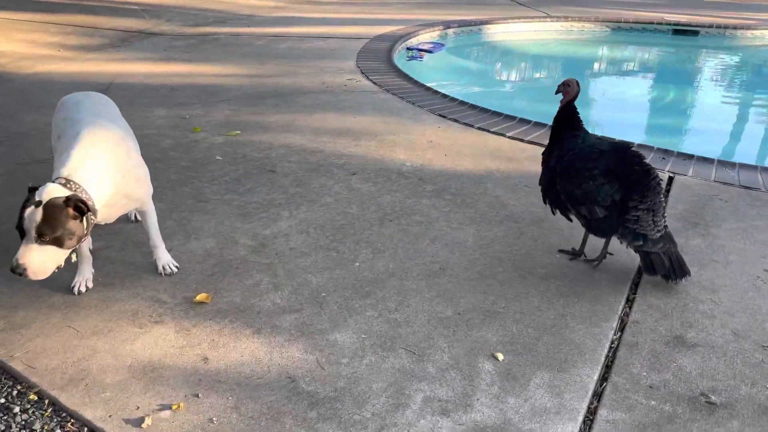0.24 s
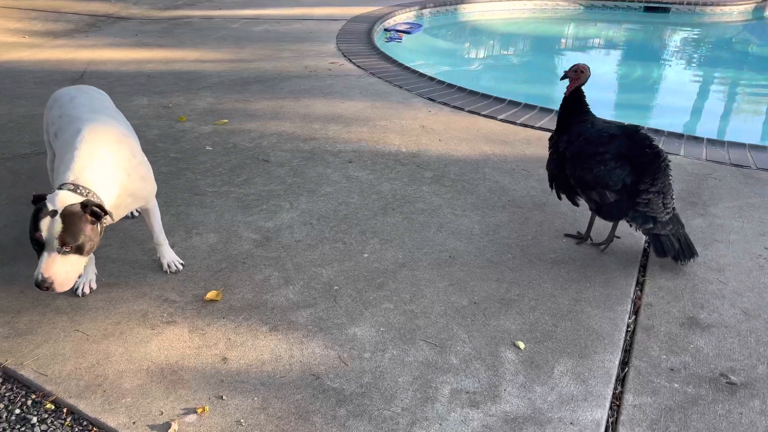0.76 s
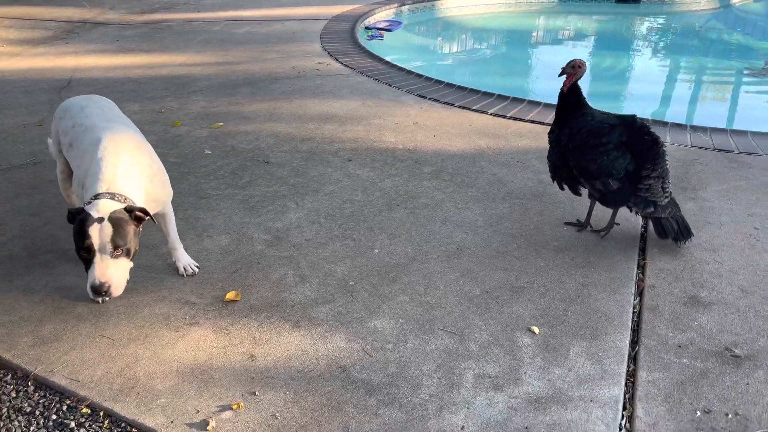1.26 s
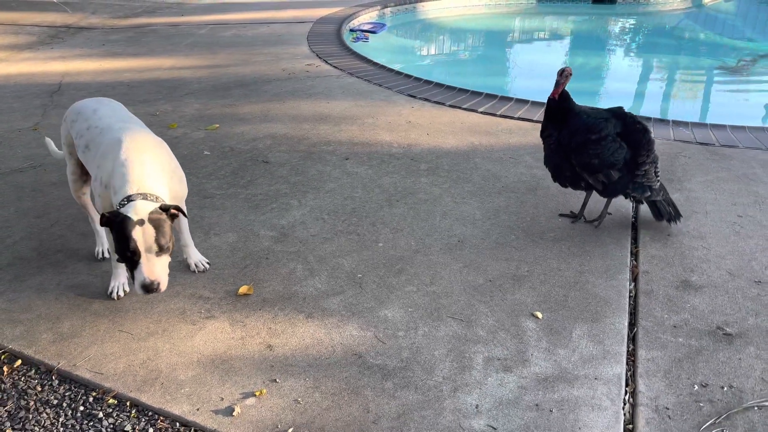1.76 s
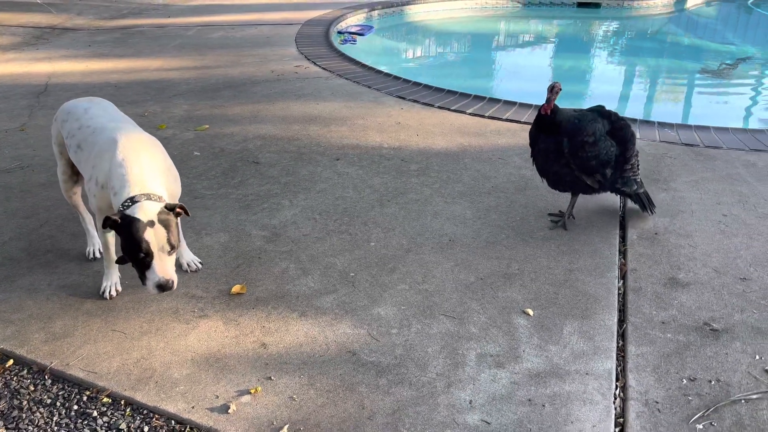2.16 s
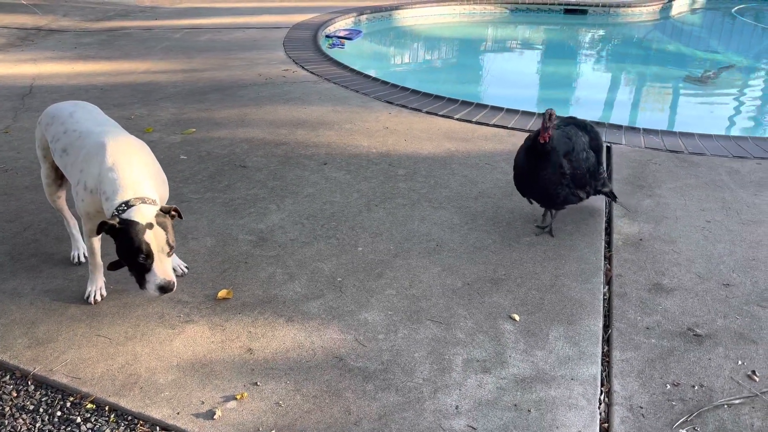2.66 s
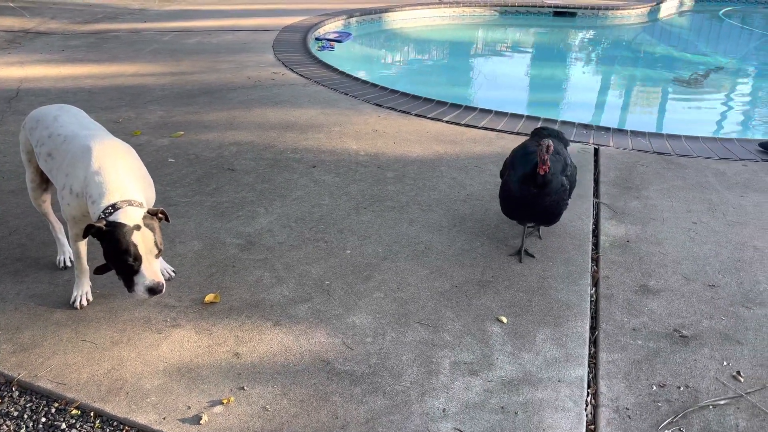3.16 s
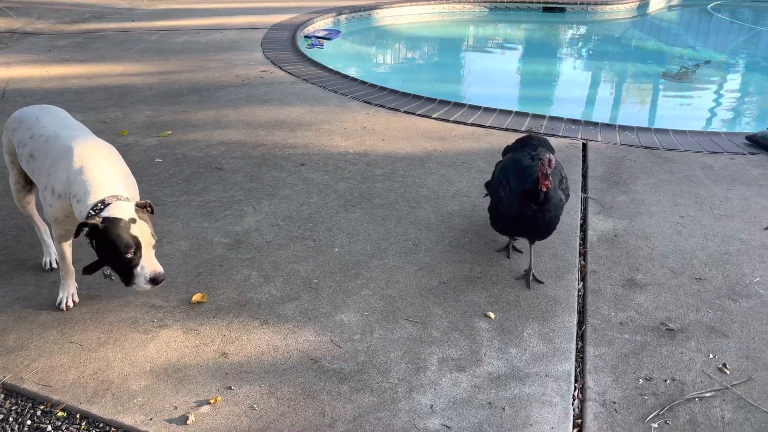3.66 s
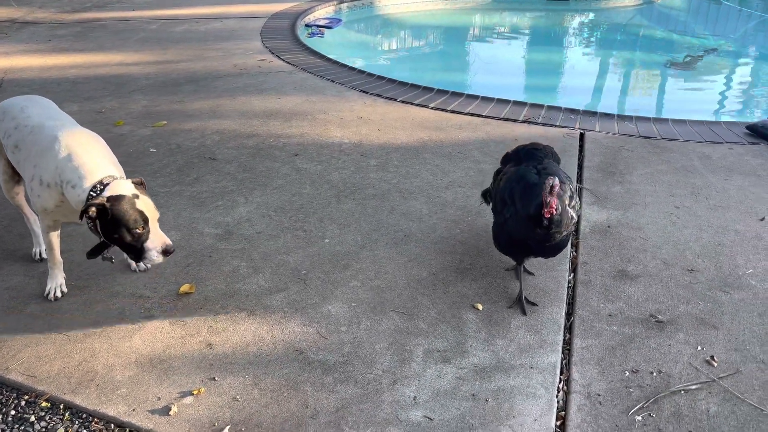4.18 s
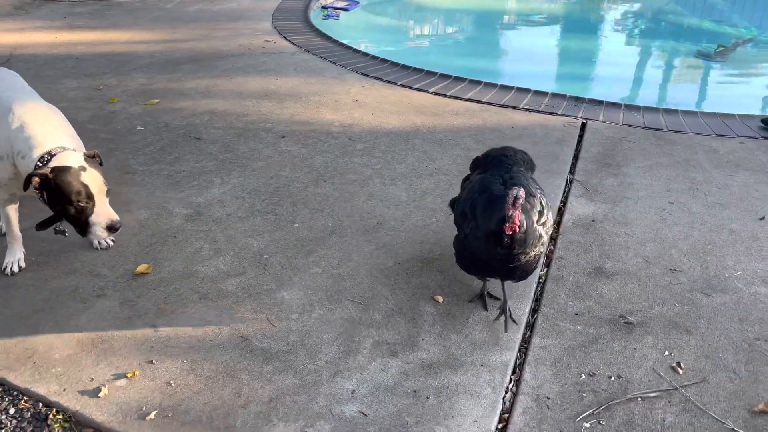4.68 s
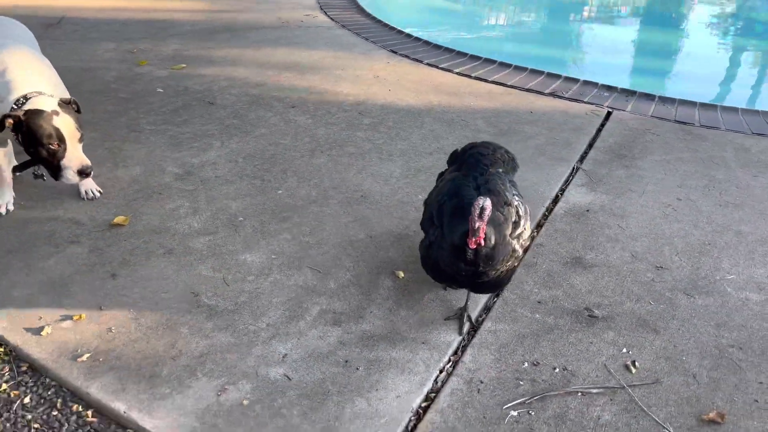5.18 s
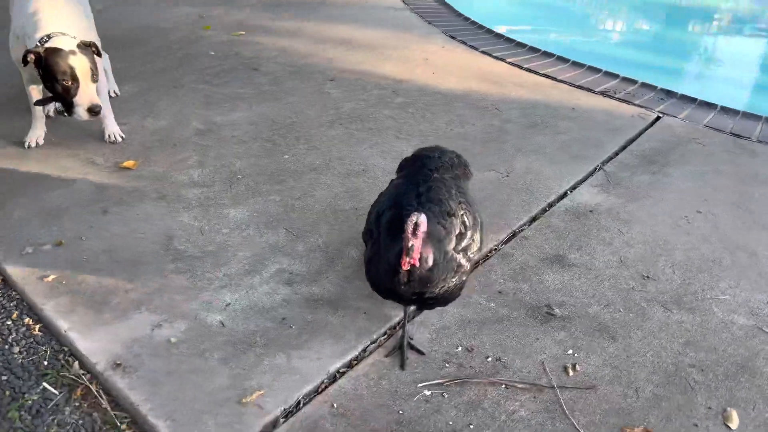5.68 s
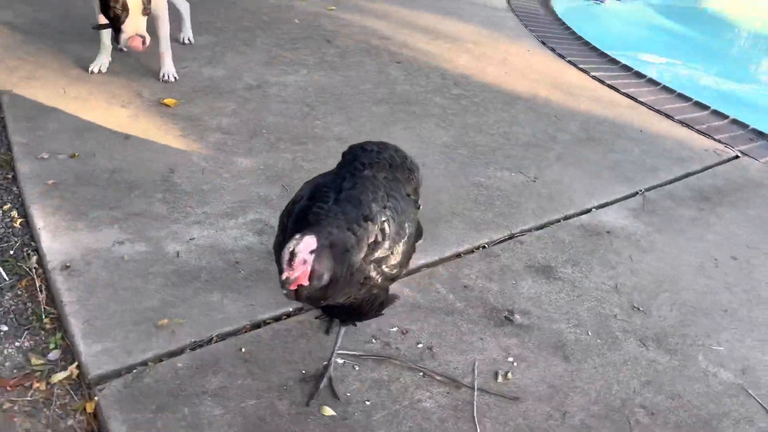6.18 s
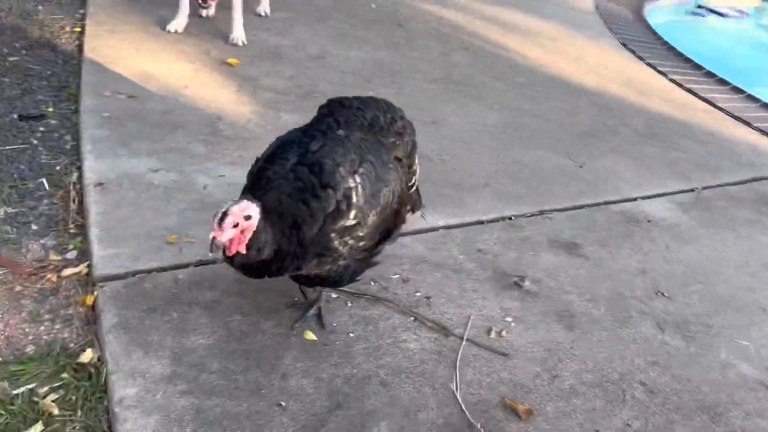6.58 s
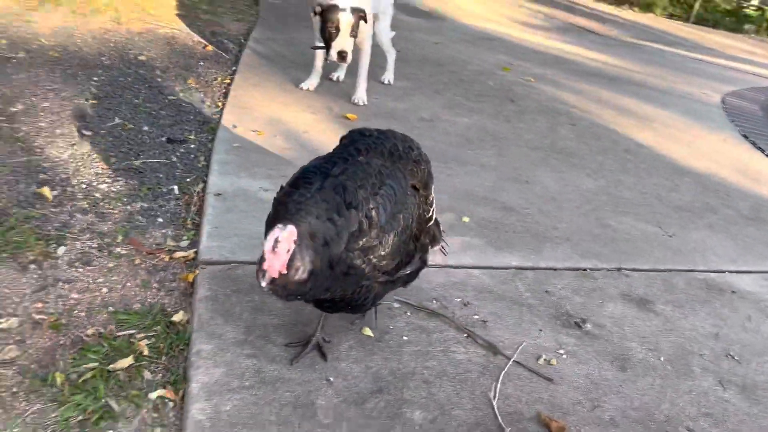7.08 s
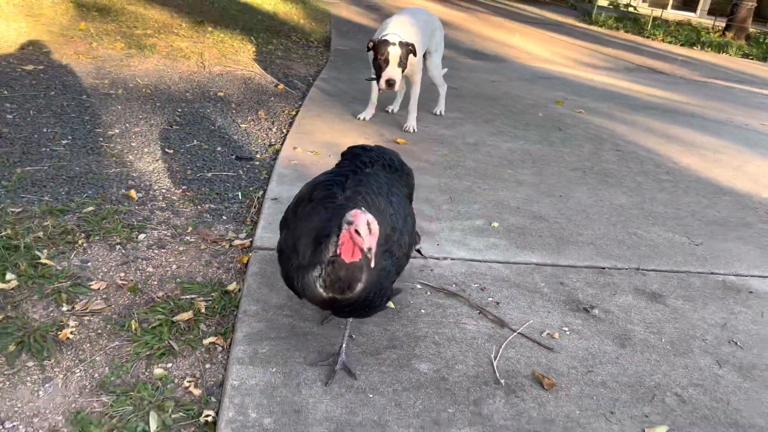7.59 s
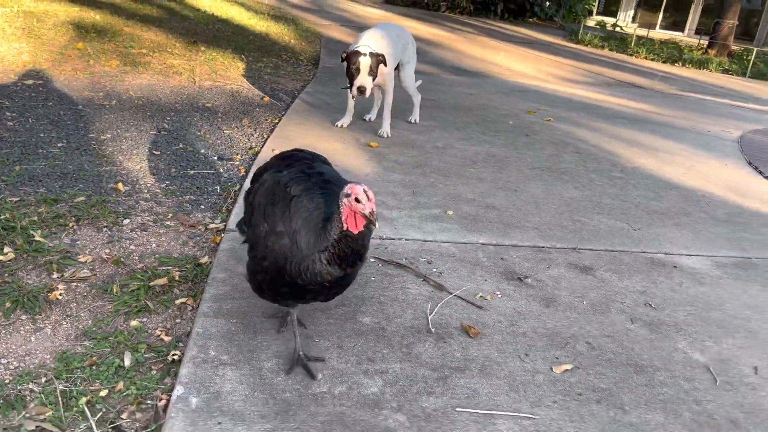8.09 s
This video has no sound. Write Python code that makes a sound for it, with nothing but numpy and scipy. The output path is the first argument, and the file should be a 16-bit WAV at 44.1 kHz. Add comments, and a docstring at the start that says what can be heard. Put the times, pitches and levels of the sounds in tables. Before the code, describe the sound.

A phone microphone outdoors by a pool hears steady low pump hum, distant traffic rumble, soft moving air, faint insect shrill and, mainly in the first 2.5 s, a far trilling bird. A turkey opens with a buzzy peep at 0 s and four rapid clucks at 0.2, another peep at 0.8, a cracked note and sharp dry pop near 1.0, then peep, clucks and a short grunt from 1.7 to 2.0. A slurred whistle comes at 2.5, two ragged yelps at 2.75 and 2.9. A small rooster crows from 2.85 to 4.75, hoarse syllables breaking upward before a long sinking note with yard echo. Turkey peeps and clucks overlap it at 4.1-4.5. Further peep-and-cluck bursts follow at 5.1, 5.9, 6.8 and 7.8, strongest around 6.1, with low grunts at 6.25 and 7.1. Claw clicks and dry pops scatter throughout, the last clucks ending near 8.2.

```python
"""Soft whistled peeps and quick runs of clucks from a turkey walking about a concrete pool deck.
A steady pump hum, distant traffic, moving air, faint insects and a far trilling bird lie underneath.
Claws and other short bright clicks tick, dry pops fall, and a small rooster crows once with a
stronger yard echo. Both birds are harmonic voices with gliding pitch, rasp and breath; air, insects
and clicks are filtered noise, and the hum and pops are sines."""
import sys
import numpy as np
from scipy import signal
from scipy.fft import rfft, irfft
from scipy.io import wavfile
from scipy.ndimage import uniform_filter1d

SR = 44100
rng = np.random.default_rng(int(sys.argv[2]) if len(sys.argv) > 2 else 0)


def transcribe(signal):
    """Save signal, clipped to [-1, 1], as a 16-bit WAV file at the path in sys.argv[1]."""
    frames = np.atleast_2d(signal).T
    limited = np.clip(frames, -1, 1)
    pcm = np.round(limited * 32767).astype(np.int16)
    wavfile.write(sys.argv[1], SR, pcm)


N = 367794
TIME = np.arange(N) / SR
FREQ = np.fft.rfftfreq(N, 1 / SR)
TOP_HZ = 15600  # the phone passes nothing much above this

# how far the turkey's beak is open: (time [s], lift of the high overtones [dB])
BEAK_OPENING = [(0, -17), (2.0, -8.5), (2.76, 3), (3.0, 6.5), (4.35, 7.5), (5.3, 10), (5.43, -7), (6.1, -9),
                (7.0, -9.5), (8.1, -10)]

# the rooster's voice break: pitch ratio of the low register, and time taken to cross over
LOW_REGISTER, BREAK_S = .908, .008


def undb(db):
    """Decibels to gain."""
    return 10 ** (np.asarray(db) / 20)


def unit(x):
    """Scale to rms 1."""
    return x / np.sqrt(np.mean(x ** 2))


def curves(rows, t):
    """The columns of a table after its time column, joined by straight lines at times t."""
    s, *columns = np.transpose(rows)
    return [np.interp(t, s, c) for c in columns]


def colour(points, hz):
    """Value of a (frequency, value) table on a log-frequency axis."""
    f, value = np.transpose(points)
    return np.interp(np.log(hz + 1), np.log(f), value)


def band(x, hz, width_hz):
    """One resonance."""
    return signal.lfilter(*signal.iirpeak(hz, hz / width_hz, fs=SR), x)


def walk(rate, size=N):
    """Smooth chance with spread near 1, drawn anew rate times a second."""
    k = max(int(SR / rate), 1)
    held = np.repeat(rng.standard_normal(size // k + 1), k)
    return 1.298 * uniform_filter1d(uniform_filter1d(held, k), k)[:size]


def add(track, start_s, x):
    """Mix x into the track."""
    i = max(int(start_s * SR), 0)
    track[..., i:i + x.shape[-1]] += x[..., :N - i]


def ports(x, lead_ms, pan_db):
    """Two microphone ports hear a source with a lag and a level difference."""
    def port(side):
        shifted = np.interp(TIME + side * lead_ms / 1000 / 2, TIME, x)
        return shifted * undb(side * pan_db / 2)
    return np.array([port(1), port(-1)])


def yard(x, t60, gap_s, dull_hz):
    """Scattered echoes from fences, house and trees: decaying noise, duller than the source."""
    t = TIME[:SR]
    onset = np.clip(t / gap_s - 1, 0, 1)
    echoes = rng.standard_normal((2, SR)) * undb(-60 * t / t60) * onset
    echoes /= np.sqrt(np.sum(echoes ** 2, axis=1, keepdims=True))
    echoes = signal.lfilter(*signal.butter(1, min(dull_hz, SR / 3), fs=SR), echoes)
    return signal.fftconvolve(x[None], echoes, axes=1)[:, :N]


def wash(points, db, flicker_db, treble_db=0):
    """Far noise in overlapping octave bands that waver; the deep bass is nearly alike at both ports."""
    # likeness of the noise at the two ports: (frequency [Hz], correlation [-1..1])
    likeness = [(25, 0.92), (60, 1), (130, 0.86), (290, 0.84), (640, -0.022), (1400, -0.44), (3100, 0.37),
                (7000, -0.31), (14000, 0.46)]
    # side to which the noise leans: (frequency [Hz], left minus right [dB])
    lean = [(300, 0), (900, 1.5), (2300, -1.5), (3700, -2.5), (4700, 3.5), (6500, 4), (9000, -1)]
    alike = np.clip(colour(likeness, FREQ), -1, 1)
    noise = rfft(rng.standard_normal((2, N)))
    mid, side = noise * np.sqrt([1 + alike, 1 - alike]) * undb(colour(points, FREQ))
    left = undb(colour(lean, FREQ) / 2)
    spectrum = np.array([(mid + side) * left, (mid - side) / left])
    octave = np.log2(FREQ + 1)
    low, high = np.log2(points[0][0]), np.log2(points[-1][0])
    out = np.zeros((2, N))
    for k in np.arange(low, high + 1):
        one_band = irfft(spectrum * np.maximum(1 - abs(octave - k), 0), N)
        out += one_band * undb(flicker_db * walk(6) + treble_db * (2 ** k > 3000))
    return undb(db) * unit(out)


def far_bird():
    """Distant trilled calls: narrow noise pulsed in swells, the pulse rate wandering."""
    # far calls: (time of the middle [s], length [s], level [dB])
    far_calls = [(.075, .3, -49.5), (.713, .6, -56), (1.602, .26, -52.5), (2.373, .26, -52.5)]
    trill_hz = 44  # mean pulses a second
    swells = sum(undb(db) * np.exp(-(2 * (TIME - s) / length) ** 2) for s, length, db in far_calls)
    pulses = 1 + .45 * np.sin(2 * np.pi * np.cumsum(trill_hz * (1 + .25 * walk(25))) / SR)
    noise = rng.standard_normal((2, N))
    return swells * pulses * unit(band(band(noise, 2680, 420), 2680, 420))


def pump():
    """The pool pump: steady sine lines that waver a little in pitch and level."""
    # pump lines: (mean frequency [Hz], middle level [dB])
    hum_lines = [(60, -53), (119, -53), (1042, -65.5)]
    hum = np.zeros(N)
    for hz, db in hum_lines:
        phase = 2 * np.pi * np.cumsum(hz + 1.53 * walk(9)) / SR
        hum += np.sqrt(2) * undb(db + 1.8 * walk(2.6)) * np.sin(phase)
    return hum


def insects():
    """A faint shrill: narrow noise that flickers and slowly sinks."""
    noise = rng.standard_normal((2, N))
    level_db = np.interp(TIME, [0, 8.3], [-62, -68]) + 3 * walk(25)
    return unit(band(band(noise, 4510, 400), 4510, 400)) * undb(level_db)


def garden():
    """Traffic rumble and moving air as shaped noise, with the pump, insects and far bird."""
    # traffic spectrum: (frequency [Hz], relative density [dB])
    rumble = [(12, -44), (20, -9), (27, -11.5), (52, -4.5), (70, 0.5), (124, -6.5), (161, -10.5),
              (217, -12.5), (293, -14), (356, -18), (385, -20), (450, -25.5), (580, -54.5), (990, -120)]
    # moving-air spectrum: (frequency [Hz], relative density [dB])
    air = [(260, -46), (450, -4), (900, 2.5), (1400, -1), (1700, -4), (2800, -11), (3700, -16.5),
           (4700, -13.5), (5400, -17), (8700, -19), (10500, -37.5), (12000, -23), (15500, -33.5),
           (17000, -56.5)]
    # slow changes in the treble of the far hiss: (time [s], treble [dB])
    brightness = [(0, 3), (.7, 0.5), (2.4, 1), (3.2, 1.5), (5.5, 2), (8.3, 0.5)]
    treble_db, = curves(brightness, TIME)
    traffic = wash(rumble, db=-41.3, flicker_db=.4)
    moving_air = wash(air, db=-46.1, flicker_db=.7, treble_db=treble_db)
    return traffic + moving_air + pump() + insects() + far_bird()


def turkey():
    """One walking voice: its lag and balance between the ports drift, over a short faint yard echo."""
    # the turkey's bearing: (time [s], lead of the left port [ms], left minus right [dB])
    bearing = [(0, -0.17, -0.5), (2, -0.15, 0.5), (2.8, -0.056, 1), (4.4, -0.094, 2), (5.35, -0.0705, -0.5),
               (6.15, 0.1, 2.37), (7.05, 0.15, 6), (8.1, 0.12, 4)]
    voice = held_peeps() + clucks() + slurs() + grunts() + yelps()
    direct = ports(voice, *curves(bearing, TIME))
    return direct + undb(-12.5) * yard(voice, t60=.34, gap_s=.0038, dull_hz=5000)


def syrinx(s, hz, db, rasp_db, jitter=.012, pure_db=-27, buzz_hz=700, clear_hz=900, flutter_db=1,
           breath_db=-14, rolloff_db=6, shrill_db=-6, scatter_db=2.5):
    """A near-pure whistle; at low pitch slack membranes slap, adding overtones an open beak lets out."""
    # the turkey's throat colouring the overtones: (frequency [Hz], gain [dB])
    throat = [(1000, 0), (1530, 9), (1800, 1), (2160, 10.5), (2600, -1), (2850, 2), (3200, -2), (3850, 1),
              (4400, -3), (5000, -15), (9000, -29)]
    size = len(hz)
    phase = 2 * np.pi * np.cumsum(hz * (1 + jitter * walk(500, size))) / SR
    slack = np.clip((clear_hz - hz) / (clear_hz - buzz_hz), 0, 1)
    gape_db, = curves(BEAK_OPENING, s)
    overtones = np.zeros(size)
    for k in range(2, 9):
        lift_db = gape_db * np.clip(k * hz / 800 - 3, 0, 1) - rolloff_db * (1 - slack) * (k - 2)
        gain_db = colour(throat, k * hz) + lift_db + scatter_db * walk(150, size)
        overtones += undb(gain_db) * np.cos(k * phase) * (k * hz < TOP_HZ)
    rasp = undb(pure_db + slack * (rasp_db - pure_db) + 2.1 * walk(400, size))
    # squeezed to the top of its range the voice turns shrill
    rasp = rasp + undb(shrill_db + gape_db / 2) * np.clip(hz / 1150 - 1, 0, .5)
    # air escapes once a cycle
    hiss = unit(band(band(rng.standard_normal(size), 2400, 2800), 2400, 2800))
    puffs = hiss * (1 + np.cos(phase)) / 2
    breath = undb(breath_db + gape_db) * np.sqrt(rasp) * puffs
    # a taut voice flutters more than a slack one
    swell = undb(db + flutter_db * (1 - slack) * walk(350, size))
    ends = signal.windows.tukey(size, min(.0071 * SR / size, 1))
    return np.sqrt(2) * swell * ends * (np.sin(phase) + rasp * overtones + breath)


def held_peeps(soft_start_db=-3, buzz_db=-13.5, pure_start_db=-14):
    """Held whistles: a scoop up, a middle that settles and grows buzzy if low, a flick at the end."""
    # peeps: (start [s], length [s], scoop [s], early pitch [Hz], late pitch [Hz], closing flick [octaves],
    # level at the end before the flick's fade [dB], swell [dB])
    peeps = [(.01, .17, .035, 900, 764, .7, -33.5, 10.5), (.799, .16, .048, 1010, 758, .7, -32, 7.5),
             (1.67, .136, .035, 1000, 1015, .6, -39, 6.5), (4.1, .13, .05, 1020, 1030, -.25, -39.5, 1),
             (5.118, .11, .025, 985, 1060, .5, -39, 3.5), (5.931, .104, .025, 1031, 1018, .6, -39, 1),
             (6.812, .11, .025, 1045, 1015, .6, -37, -2), (7.811, .116, .02, 1080, 965, .6, -42, 2)]
    rest_hz, flick_s, flick_db = 760.7, .018, -6  # pitch the scoop leaves; the flick's length and fade
    out = np.zeros(N)
    for s, length, scoop_s, early_hz, late_hz, flick_octaves, db, swell_db in peeps:
        t = np.arange(0, length, 1 / SR)
        scoop = np.clip(1 - t / scoop_s, 0, 1)
        flick = np.clip(1 - (length - t) / flick_s, 0, 1) ** 2
        fresh = (1 - t / length) ** 2
        held_hz = late_hz + (early_hz - late_hz) * fresh
        hz = (held_hz + (rest_hz - held_hz) * scoop) * 2 ** (flick_octaves * flick)
        level_db = db + swell_db * (t / length - 1) + soft_start_db * scoop + flick_db * flick
        add(out, s, syrinx(s, hz, level_db, rasp_db=buzz_db + pure_start_db * fresh, pure_db=-23,
                           buzz_hz=690, clear_hz=860, rolloff_db=26))
    return out


# sound before and after a cluck's lowest pitch [s], before each run's length factor
LEAD_S, TRAIL_S = .0245, .022


def clucks():
    """Runs of about twenty clucks a second that quicken and grow fuller."""
    # runs: (lowest point of the first cluck [s], clucks [count], first gap [s], settled pitch [Hz],
    # settled level [dB], rasp setting [dB], held back at the start [0-1], length factor [ratio],
    # squeak [dB])
    runs = [(.223, 4, .053, 728, -33.5, -12, 0, 1.15, -4), (1.849, 3, .054, 755, -32, -10, 0, 1.12, -2),
            (4.285, 4, .054, 710, -34, -8, 0, 1, -4), (5.274, 4, .052, 725, -31, -4, .85, 1, -4),
            (6.081, 4, .052, 728, -26.5, -8, 1, 1, 4), (6.963, 4, .0518, 705, -27, -8, .5, 1.05, -1),
            (7.97, 4, .0538, 732, -29.5, -10, 0.53, .95, -3)]
    quicken, settle = .96, .38  # share of the gap, and of the early restraint, kept from cluck to cluck
    # the first cluck is softer and, if held back, purer and higher
    first_db, first_rasp_db, first_octaves = -3, -17, .129
    out = np.zeros(N)
    for s, count, gap_s, hz, db, rasp_db, held_back, stretch, squeak_db in runs:
        for k in range(round(count)):
            early = settle ** k
            restraint = held_back * early
            sound = cluck(s, hz * 2 ** (first_octaves * restraint), db + first_db * early,
                          rasp_db + first_rasp_db * restraint, squeak_db, stretch)
            add(out, s - LEAD_S * stretch, sound)
            s = s + gap_s * quicken ** k
    return out


def cluck(s, low_hz, db, rasp_db, squeak_db, stretch, flank_spread=.11, flank_scatter_db=3, taper=.2):
    """Pitch swoops down, then cracks up into a squeak; loudest near the bottom, no two swoops alike."""
    # all times here count from the lowest pitch, before the length factor
    # flanks: swoop time [s], height [octaves], steepness, fading [dB per octave]
    swoop_down, swoop_up = (.021, 1.2, 2.1, -11), (.0115, .95, 2.2, -6)
    # on the way up the voice cracks
    crack_s, crossing_s, jump_octaves, jump_db, crack_jitter = .0095, .0015, .45, -6, .13
    # on the way down it catches between the registers
    catch_s, catch_width_s, catch_db = .0155, .002, -6
    # a push of air at the bottom makes it loud and raspy
    push_s, push_width_s, push_db, push_rasp_db = .003, .0105, 6.5, 11

    t = np.arange(-LEAD_S, TRAIL_S, 1 / (SR * stretch))
    easing = 1 - np.exp(-((t - push_s) / push_width_s) ** 2)
    cracked = (1 + np.tanh((t - crack_s) / crossing_s)) / 2
    uncaught = (1 + np.tanh((-t - catch_s) / crossing_s)) / 2
    catch = np.exp(-((t + catch_s) / catch_width_s) ** 2)
    octaves = jump_octaves * cracked
    swell_db = jump_db * cracked + squeak_db * (cracked + uncaught) - push_db * easing + catch_db * catch
    for away, swoop in ((-t, swoop_down), (t, swoop_up)):
        swoop_s, height, steep, fade_db = swoop
        height_chance, fade_chance = rng.standard_normal(2)
        rise = 1 - np.exp(-(np.maximum(away, 0) / swoop_s) ** steep)
        flank = height * (1 + flank_spread * height_chance) * rise
        octaves = octaves + flank
        swell_db = swell_db + (fade_db + flank_scatter_db * fade_chance) * flank
    sound = syrinx(s, low_hz * 2 ** octaves, db + swell_db, rasp_db - 7 - push_rasp_db * easing,
                   jitter=.03 + crack_jitter * np.sin(np.pi * cracked), pure_db=-18.5, flutter_db=2.5,
                   buzz_hz=low_hz * 1.1, clear_hz=low_hz * 1.5)
    return (sound + undb(db) * splinter(s, t)) * signal.windows.tukey(len(t), min(taper, 1))


def splinter(s, t):
    """Membranes flap out of step briefly: a burst of noise, brighter from an open beak."""
    late_s, width_s, db = .008, .0065, -18  # after the lowest pitch; level relative to the cluck
    octaves_per_db = .03  # brightening per dB of beak opening
    gape_db, = curves(BEAK_OPENING, s)
    hz = 2000 * 2 ** (octaves_per_db * gape_db)
    rasp = unit(band(band(rng.standard_normal(len(t)), hz, hz * .8), hz, hz * .8))
    return undb(db) * rasp * np.exp(-((t - late_s) / width_s) ** 2)


def clicks_and_pops(scrape_s=.023, knock_s=.0077, pop_s=.0006, knock_db=-8, tick_s=.003, tick_db=-2):
    """Claws and other clicks as decaying resonant noise, and dry pops as very short sine bursts."""
    # claws on concrete and other short bright clicks: (time [s], knock level before an 8 dB cut [dB],
    # bright scrape level [dB])
    clicks = [(0.2495, -35, -54), (0.3153, -37, -45.5), (.409, -36, -60), (2.921, -36, -48),
              (4.3988, -28.5, -53), (5.257, -31, -51), (5.5065, -35, -42.5), (5.8478, -30.5, -55),
              (5.9025, -27, -54), (5.92, -28.5, -42.5), (6.037, -34.5, -48), (6.933, -29, -48),
              (8.152, -47, -48)]
    # dry pops: (time [s], level [dB], sine frequency [Hz])
    pops = [(1.0501, -21, 940), (1.252, -30, 1300), (4.708, -27, 1150), (5.18, -32, 1390),
            (5.859, -29.5, 1850), (6.482, -30.5, 1100), (7.744, -29.5, 1600)]
    out, t = np.zeros((2, N)), TIME[:SR // 20]

    def noise():
        return rng.standard_normal((2, len(t)))

    for s, peak_db, scrape_db in clicks:
        knock = unit(band(noise(), 1900, 2200)) * np.exp(-t / knock_s)
        scrape = unit(band(band(noise(), 5200, 4200), 4900, 4900)) * np.exp(-t / scrape_s)
        tick = unit(band(noise(), 12500, 6000)) * np.exp(-t / tick_s)
        bright = scrape + undb(tick_db) * tick
        add(out, s, undb(peak_db + knock_db) * knock + undb(scrape_db) * bright)
    for s, db, hz in pops:
        burst = (t / pop_s) ** 2 * np.exp(2 * (1 - t / pop_s))
        add(out, s, undb(db) * np.sin(2 * np.pi * hz * t) * burst)
    return out


def slurs():
    """Two lone notes whose pitch and level slide from point to point."""
    # a drawn-out cluck that climbs, cracks upward and drops: (time [s], pitch [Hz], level [dB])
    cracked_note = [(.981, 860, -44), (.997, 660, -37), (1.006, 830, -32), (1.014, 900, -37),
                    (1.016, 1280, -35), (1.026, 1150, -39), (1.028, 800, -43), (1.035, 700, -48)]
    # a slow slurred whistle: (time [s], pitch [Hz], level [dB])
    slurred_note = [(2.465, 740, -46), (2.505, 1210, -47), (2.55, 1120, -50.5), (2.595, 852, -44),
                    (2.66, 804, -39.5), (2.702, 619, -48)]
    out = np.zeros(N)
    for note in (cracked_note, slurred_note):
        t = np.arange(note[0][0], note[-1][0], 1 / SR)
        add(out, t[0], syrinx(t[0], *curves(note, t), rasp_db=-20, pure_db=-23, rolloff_db=11))
    return out


def grunts(edge_db=-10):
    """The voice drops to a low buzz, swells and lets go."""
    # low closing notes: (start [s], length [s], middle pitch [Hz], level in the middle [dB], glide [octaves])
    low_notes = [(1.98, .058, 688, -38, -.1), (4.755, .11, 645, -46, .2), (6.25, .05, 560, -45, -.7),
                 (7.139, 0.057, 604, -34, .03)]
    drop_s, drop_octaves = .007, .9  # the opening fall in pitch
    out = np.zeros(N)
    for s, length, hz, db, glide in low_notes:
        t = np.arange(0, length, 1 / SR)
        along = 2 * t / length - 1
        octaves = drop_octaves * np.exp(-t / drop_s) + glide * along / 2
        add(out, s, syrinx(s, hz * 2 ** octaves, db + edge_db * along ** 2, rasp_db=-18, jitter=.035))
    return out


def yelps(leap_steep=2.8, arch=2.9, full_hz=880, slack_db=-12):
    """Pitch leaps raggedly to a thin top and arches back; fullest in mid range, weak below."""
    # yelps: (start [s], length [s], pitch the leap aims for [Hz], mid-range level before the fade [dB])
    yelp_notes = [(2.743, .12, 1310, -32.5), (2.913, .124, 1420, -31)]
    low_hz, leap_s, top_db, fade_db = 610, .022, -19, -6
    out = np.zeros(N)
    for s, length, top_hz, db in yelp_notes:
        t = np.arange(0, length, 1 / SR)
        height = (1 - np.exp(-(t / leap_s) ** leap_steep)) * (1 - (t / length) ** arch)
        hz = low_hz * (top_hz / low_hz) ** height
        pitch_points = [low_hz, (low_hz + full_hz) / 2, full_hz, (full_hz + top_hz) / 2]
        strength_db = np.interp(hz, pitch_points, [slack_db, 0, 0, top_db])
        ragged = np.exp(-t / leap_s)
        add(out, s, syrinx(s, hz, db + strength_db + fade_db * t / length, rasp_db=-21 + 9 * ragged,
                           jitter=.015 + .04 * ragged, pure_db=-21, buzz_hz=760, clear_hz=980,
                           shrill_db=6, scatter_db=4.5))
    return out


def rooster(echo_db=-6):
    """A crow: hoarse-edged syllables that break upward, then a long sinking note, echoed by the yard."""
    # opening syllables: (start [s], length [s], time in the low register [s], high-register pitch [Hz],
    # level in the middle [dB], swell [dB], roughness [0-1])
    syllables = [(2.848, .19, .06, 912, -26.5, 2, .3), (3.13, .135, .014, 1003, -29, -3, .45),
                 (3.258, .08, .04, 985, -28, 0, .7), (3.315, .25, .002, 1013, -31.5, 1, .3),
                 (3.55, .095, .002, 975, -29, -5, .85)]
    # at its edges each syllable is quieter and rougher, and it ends a little flat
    attack_s, release_share, edge_db, edge_rough, edge_sag = .024, .22, -15, .5, .03
    voice = np.zeros(N)
    for s, length, low_s, hz, db, swell_db, rough in syllables:
        t = np.arange(0, length, 1 / SR)
        release = np.clip(1 - (1 - t / length) / release_share, 0, 1)
        edge = np.maximum(1 - t / attack_s, release)
        register = np.interp(t, [low_s - BREAK_S / 2, low_s + BREAK_S / 2], [LOW_REGISTER, 1])
        pitch_hz = hz * register * (1 - edge_sag * release)
        level_db = db + swell_db * (t / length - .5) + edge_db * edge ** 2
        add(voice, s, crow(pitch_hz, level_db, rough + edge_rough * edge))
    last_start_s = 3.71
    add(voice, last_start_s, last_note(last_start_s))
    echoes = yard(voice, t60=.85, gap_s=.015, dull_hz=8040)
    return ports(voice, lead_ms=.44, pan_db=.3) + undb(echo_db) * echoes


def crow(hz, db, rough, jitter=.014, sag=.04, rough_treble_db=-1, breath_db=-11, rattle_db=-8,
         rattle_ratio=.9, rattle_spread=.045, sputter_db=3, shimmer_db=3.5, full_hz=890, dull_db_per_hz=.09):
    """Harmonics picked out by the throat; when hoarse, a second membrane rattles below the first."""
    # the rooster's throat and beak: (frequency [Hz], gain [dB])
    beak = [(640, -9), (780, -11), (900, -15), (945, -11), (1020, -4), (1120, -10), (1250, -12),
            (1500, -3.5), (1850, 1.5), (2030, -4), (2300, -33), (2750, -34), (3040, -19), (3400, -29),
            (3700, -23), (4500, -37), (5050, -27), (5300, -32), (5580, -19), (6050, -30), (6480, -39),
            (6800, -24), (7050, -30), (7320, -21), (7750, -41), (8100, -24), (8350, -28), (8620, -19),
            (9150, -40), (10100, -45), (11500, -52)]
    # high in its range the voice strains: where this starts and is full, and the half harmonics it adds
    strain_from_hz, strain_full_hz, half_db, half_spread = 950, 1000, 1, .018

    size, rough = len(hz), np.clip(rough, 0, 1)
    slips = sag * rough * np.maximum(walk(260, size) - .2, 0)
    wobble = (.0012 + jitter * rough) * walk(1100, size)
    phase = 2 * np.pi * np.cumsum(hz * (1 - slips + wobble)) / SR
    # the low register is duller
    treble_db = rough * rough_treble_db - dull_db_per_hz * np.maximum(full_hz - hz, 0)
    tone = np.zeros(size)
    for k in range(1, 13):
        upper_db = (k > 2) * (treble_db + shimmer_db * walk(14, size))
        tone += undb(colour(beak, k * hz) + upper_db) * np.sin(k * phase)
    # strain puts rasping bands between the upper harmonics
    doubled = phase + 2 * np.pi * np.cumsum(hz * half_spread * walk(500, size)) / SR
    halves = sum(undb(colour(beak, k * hz)) * np.sin(k * doubled) for k in np.arange(4.5, 10))
    strain = np.clip((hz - strain_from_hz) / (strain_full_hz - strain_from_hz), 0, 1)
    tone = tone + undb(half_db) * strain * halves
    # the loose membrane never settles on a pitch, and beats against the taut one
    loose_hz = hz * rattle_ratio
    loose = 2 * np.pi * np.cumsum(loose_hz * (1 + rattle_spread * walk(420, size))) / SR
    rattle = sum(undb(colour(beak, k * loose_hz)) * np.sin(k * loose) for k in range(1, 11))
    voice = (1 - .5 * rough) * tone + undb(rattle_db) * rough * rattle
    # hoarse air rings the same throat
    hiss = rfft(band(rng.standard_normal(size), 900, 4000))
    breath = unit(irfft(hiss * undb(colour(beak, np.fft.rfftfreq(size, 1 / SR))), size))
    ends = signal.windows.tukey(size, min(.016 * SR / size, 1))
    sputter = sputter_db * rough * np.tanh(walk(200, size))
    swell = undb(db + sputter + .8 * walk(30.3, size))
    return ends * swell * (np.sqrt(2) * voice + undb(breath_db) * np.sqrt(rough) * breath)


def last_note(start_s):
    """It scoops up hoarsely, clears, sinks, breaks to the low register and droops as the air runs out."""
    # loudness before the break: (time [s], level [dB])
    high_part = [(3.71, -40), (3.73, -32), (3.785, -23.5), (3.822, -33), (3.862, -25), (3.95, -30),
                 (3.972, -40), (4.005, -38), (4.04, -23.5), (4.064, -37), (4.078, -24), (4.106, -22),
                 (4.125, -33), (4.148, -22.5), (4.18, -22), (4.22, -26)]
    # loudness after the break: (time [s], level [dB])
    low_part = [(4.235, -28), (4.3, -32), (4.39, -27.5), (4.465, -37), (4.51, -30), (4.585, -28.5),
                (4.63, -33), (4.71, -34), (4.75, -44)]
    break_s, end_s, top_hz, sag_hz_per_s = 4.222, 4.75, 962, 128  # pitch and sag before the factors below
    hoarse_start, clearing_s, hoarse_end = .95, .12, .16
    scoop, droop, droop_s = .06, .05, .09  # scoop and droop as shares of the pitch
    t = np.arange(start_s, end_s, 1 / SR)
    age = t - start_s
    catching = np.exp(-(age / clearing_s) ** 2)
    failing = np.clip(1 - (end_s - t) / droop_s, 0, 1)
    register = np.interp(t, [break_s - BREAK_S / 2, break_s + BREAK_S / 2], [1, LOW_REGISTER])
    hz = (top_hz - sag_hz_per_s * age) * register * (1 - scoop * catching - droop * failing)
    db, = curves(high_part + low_part, t)
    return crow(hz, db, hoarse_start * catching + hoarse_end * (age / age[-1]) ** 2)


def scene():
    """Everything heard from the pool deck."""
    return garden() + turkey() + clicks_and_pops() + rooster()


def record(dry):
    """The phone cuts the top with a steep low-pass."""
    return signal.sosfilt(signal.ellip(8, .2, 70, TOP_HZ, fs=SR, output="sos"), dry)


dry = scene()
out = record(dry)
transcribe(out)
```